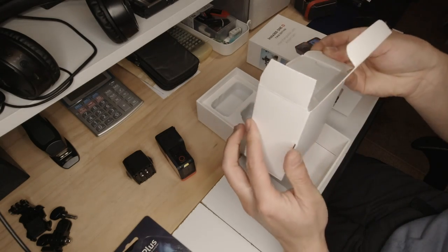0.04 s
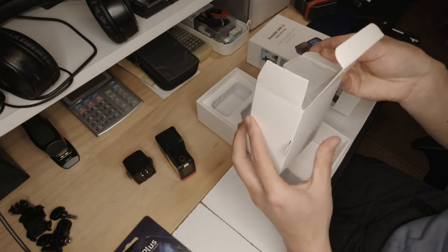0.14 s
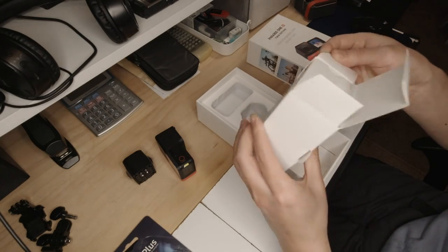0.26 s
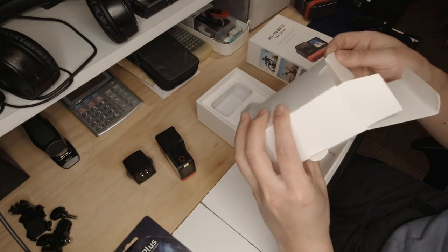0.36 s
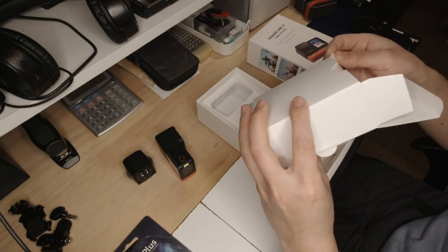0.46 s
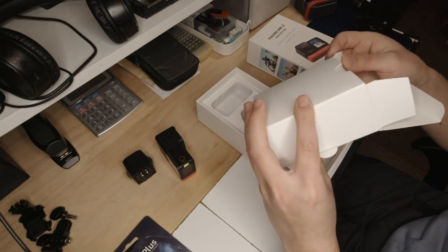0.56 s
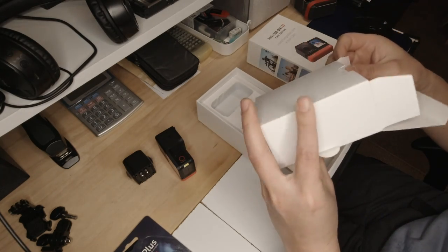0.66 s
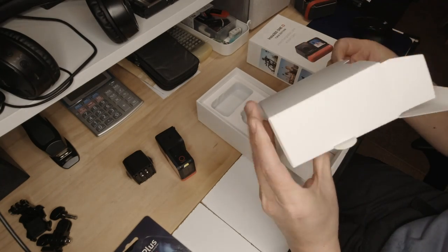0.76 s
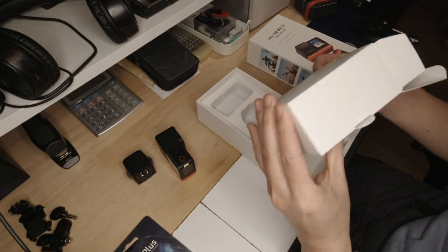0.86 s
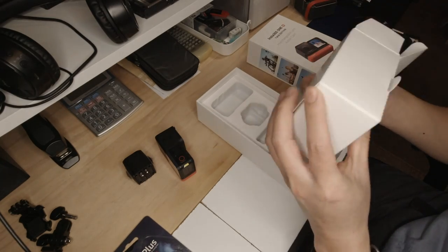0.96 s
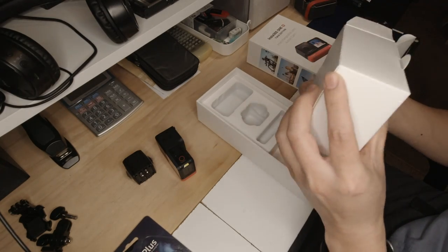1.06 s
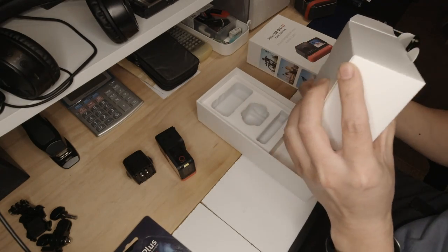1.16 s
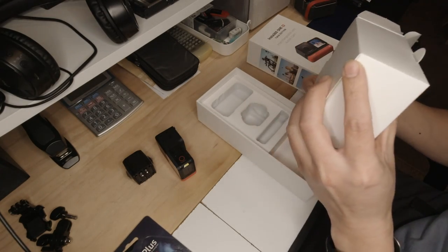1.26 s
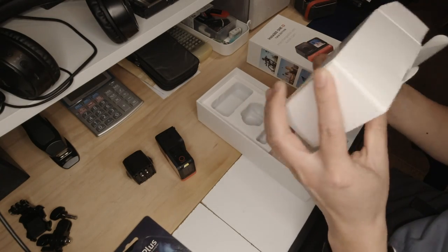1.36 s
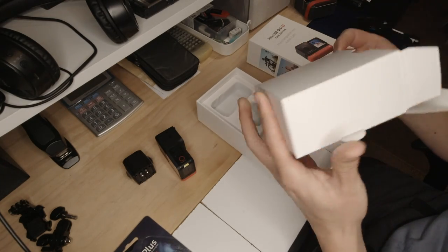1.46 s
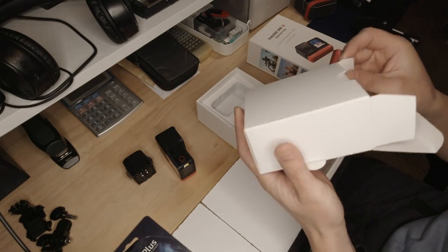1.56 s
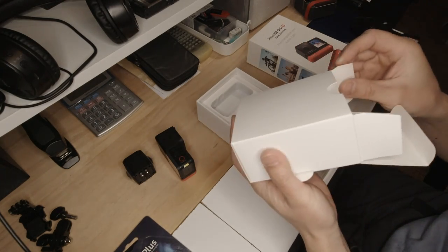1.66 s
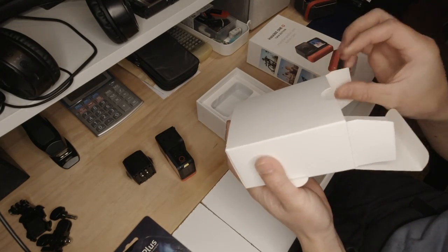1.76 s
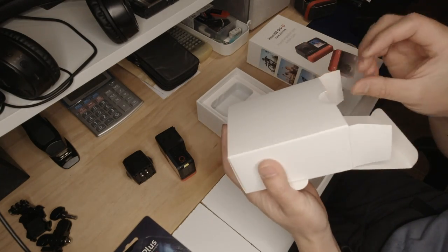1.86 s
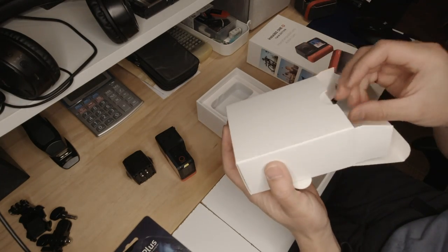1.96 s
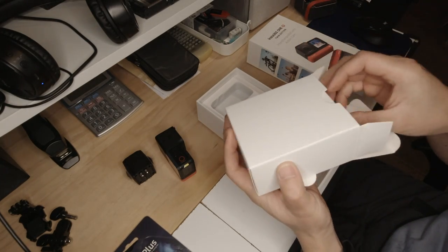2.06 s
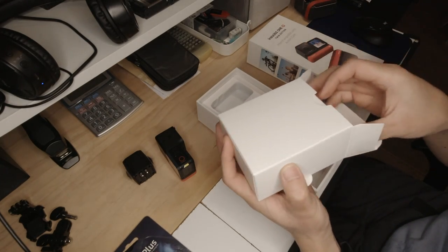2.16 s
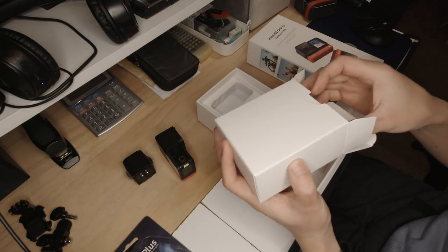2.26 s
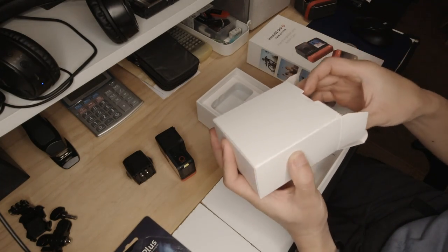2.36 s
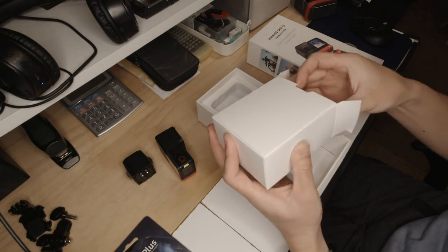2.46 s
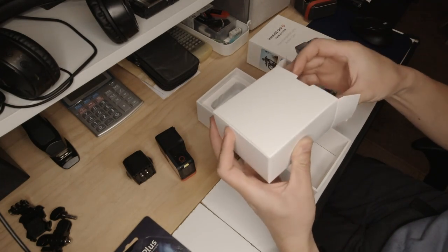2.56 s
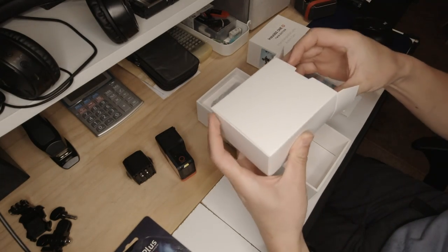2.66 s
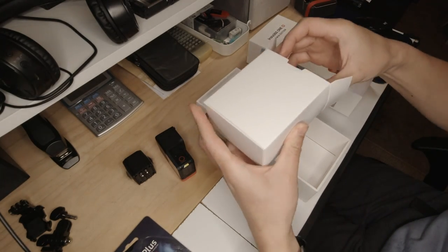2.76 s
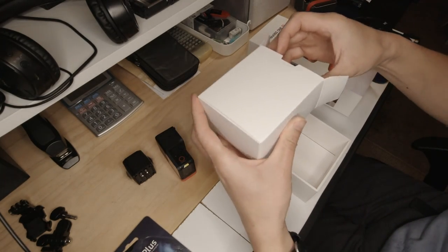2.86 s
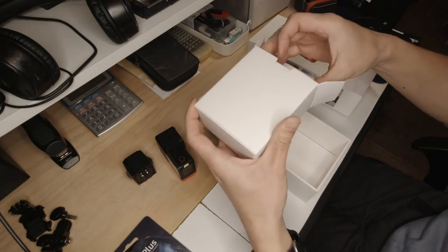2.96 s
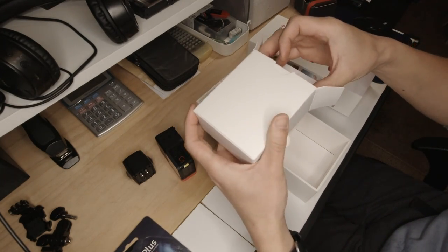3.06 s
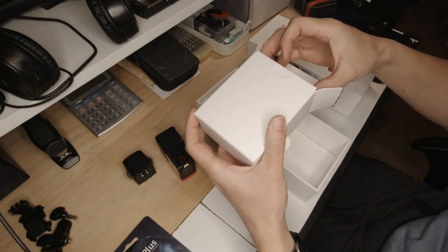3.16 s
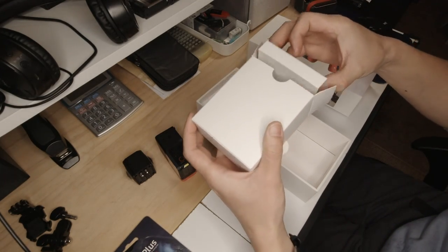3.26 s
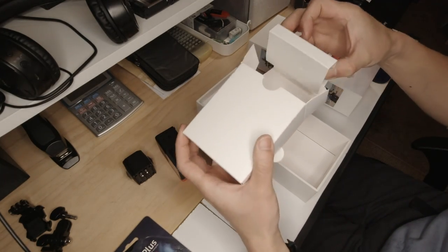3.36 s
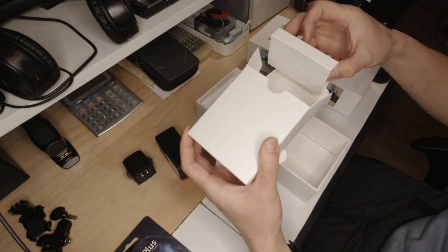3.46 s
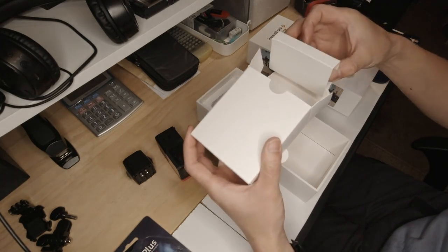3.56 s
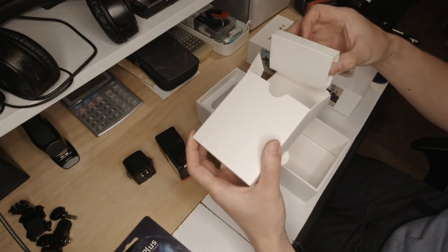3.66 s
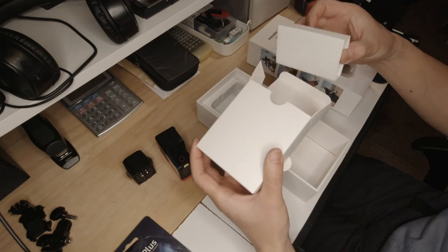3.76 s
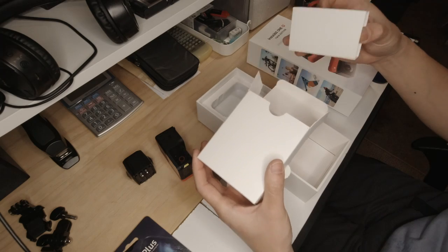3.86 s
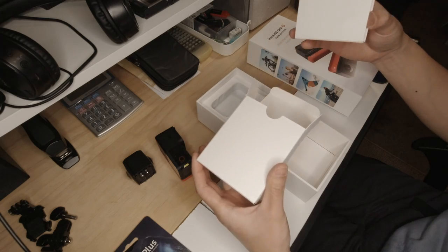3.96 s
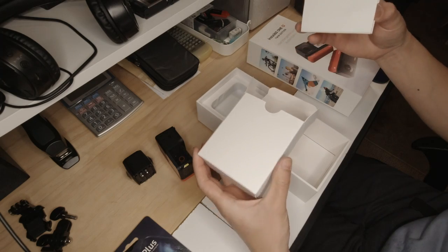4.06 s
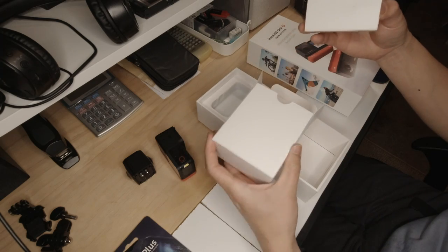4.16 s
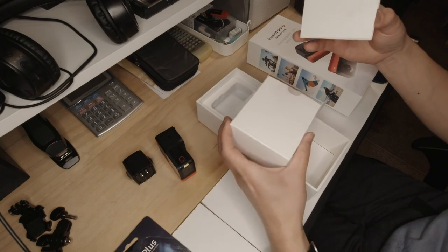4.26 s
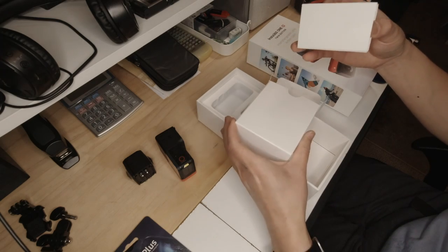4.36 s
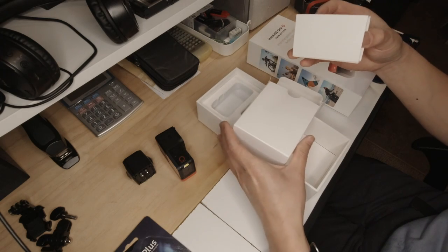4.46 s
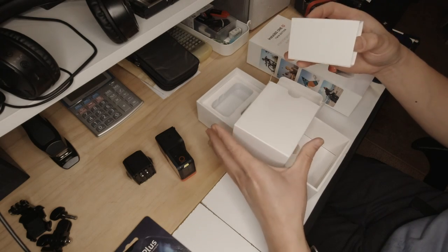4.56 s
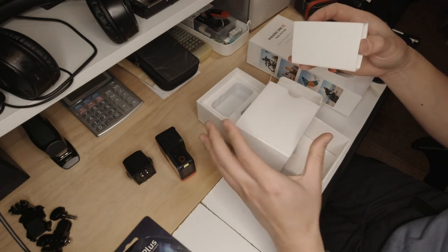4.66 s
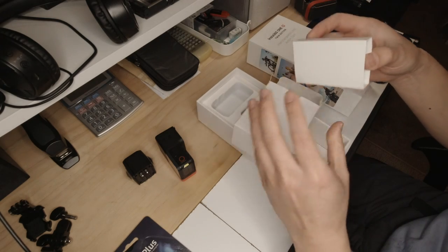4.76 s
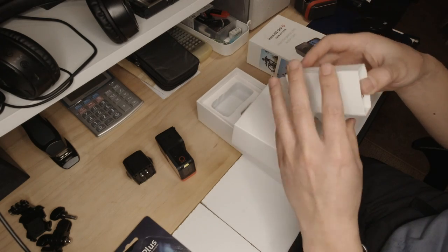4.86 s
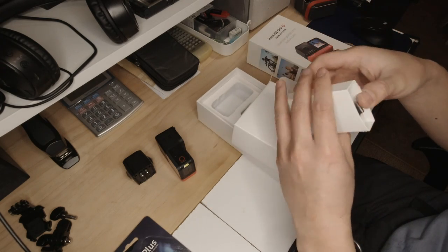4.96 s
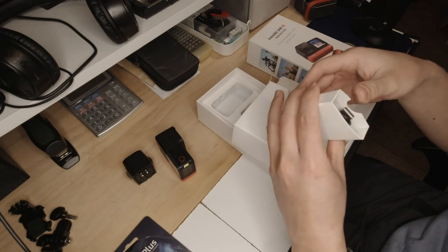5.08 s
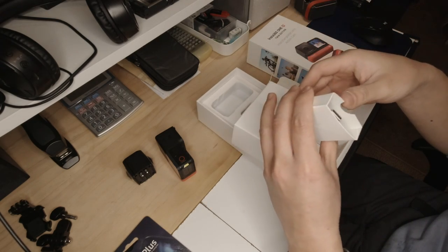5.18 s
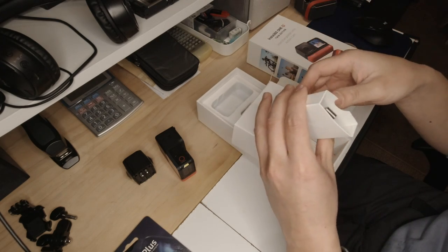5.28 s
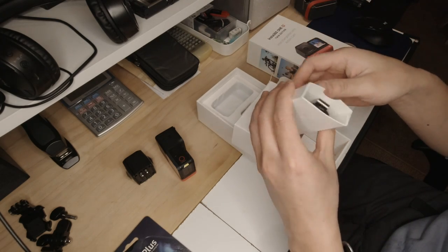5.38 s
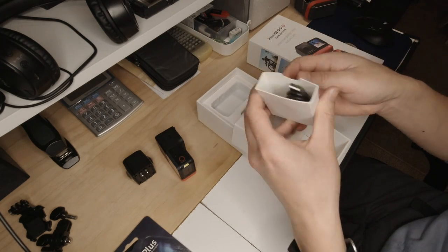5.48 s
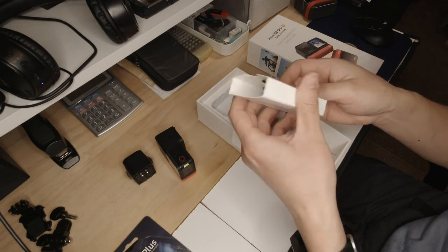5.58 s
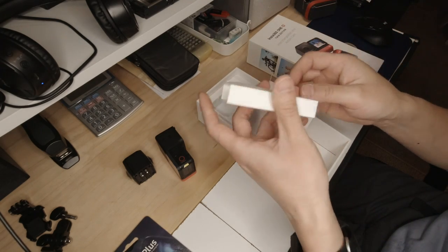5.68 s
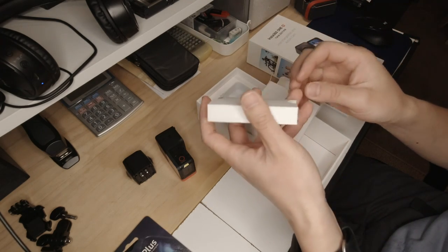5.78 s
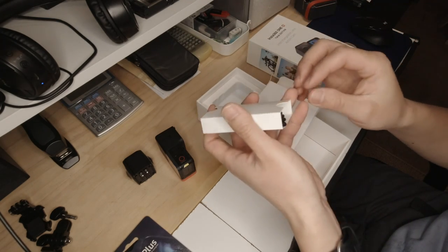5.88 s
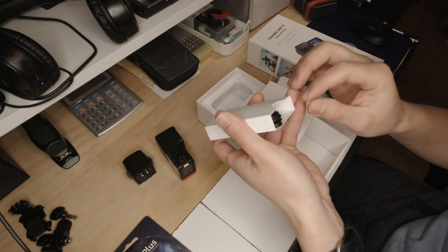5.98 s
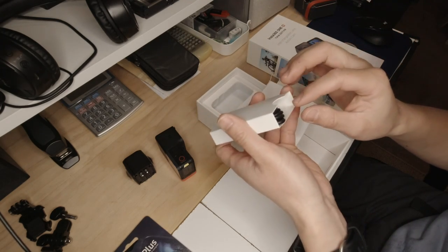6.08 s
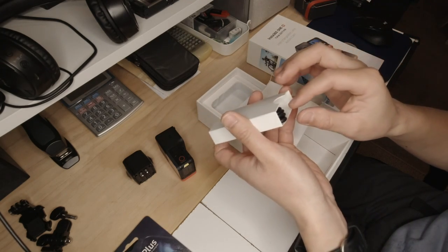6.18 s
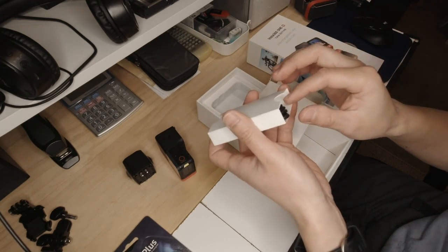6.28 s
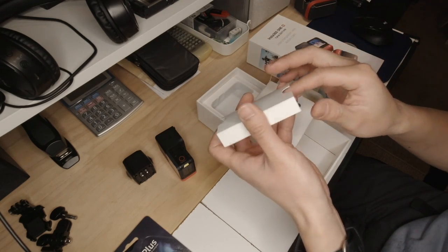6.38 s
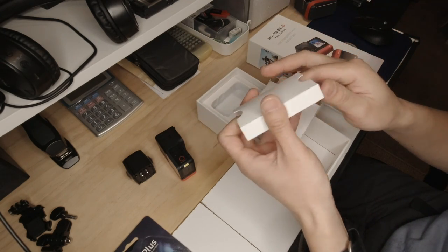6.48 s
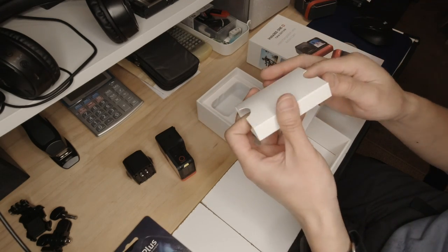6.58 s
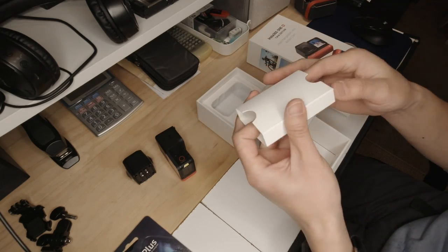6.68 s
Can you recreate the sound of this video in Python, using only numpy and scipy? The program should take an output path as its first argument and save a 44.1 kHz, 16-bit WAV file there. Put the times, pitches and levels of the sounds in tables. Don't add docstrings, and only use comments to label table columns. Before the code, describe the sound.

Stiff cardboard box turned in hands, card scraping and ticking, a small insert sliding free, a hard clattering set-down, then light dry fidgeting.

```python
import sys
import numpy as np
from scipy import signal
from scipy.fft import rfft, irfft
from scipy.io import wavfile
from scipy.ndimage import uniform_filter1d

SR = 44100
rng = np.random.default_rng(int(sys.argv[2]) if len(sys.argv) > 2 else 0)


def makeup_ratio(level_db):
    decades = np.asarray(level_db, float) / 20
    return 10 ** decades


def put_to_file(sound):
    columns = np.atleast_2d(sound).T
    safe = np.clip(columns, -1, 1)
    whole_steps = np.round(safe * 32767)
    wavfile.write(sys.argv[1], SR, whole_steps.astype(np.int16))


N = 296793
INSERT_S = 5


def unit(x):
    return x / np.sqrt(np.mean(x ** 2))


def peak(x):
    return x / np.abs(x).max()


def add(out, s, x):
    i = int(s * SR)
    out[i:i + len(x)] += x[:N - i]


def walk(rate_hz):
    k = int(SR / rate_hz)
    return uniform_filter1d(np.repeat(rng.standard_normal(N // k + 1), k), k)[:N]


def response(table):
    hz, db = np.transpose(table)
    f = np.maximum(np.fft.rfftfreq(4096, 1 / SR), 1)
    cepstrum = irfft(np.interp(np.log(f), np.log(hz), db) * np.log(10) / 20)
    cepstrum[1:2048] *= 2
    cepstrum[2049:] = 0
    return irfft(np.exp(rfft(cepstrum)))[:2048]


def band(x, lo_hz, hi_hz):
    return signal.sosfilt(signal.butter(3, [lo_hz, hi_hz], "band", fs=SR, output="sos"), x)


def filtered(x, order, hz, kind="low"):
    return signal.lfilter(*signal.butter(order, hz, kind, fs=SR), x)


def ring(x, hz, t60_s):
    pole = np.exp(2j * np.pi * hz / SR - np.log(1000) / (max(t60_s, .002) * SR))
    return signal.lfilter([1], [1, -pole], x).imag


def glide(x, hz, t60_s):
    turn = np.exp(2j * np.pi * np.cumsum(hz) / SR)
    decay = np.exp(-np.log(1000) / (max(t60_s, .002) * SR))
    return (turn * signal.lfilter([1], [1, -decay], x / turn)).imag


def slips(count, rate_hz, spread_db, smooth):
    sizes = makeup_ratio(np.minimum(spread_db * rng.exponential(size=count), 12))
    clicks = (rng.random(count) < rate_hz / SR) * sizes
    return unit(clicks) * np.sign(rng.standard_normal(count)) + smooth * rng.standard_normal(count)


# peak in seconds, rise in seconds, fall in seconds, peak level in dB,
# level of the card's flat against its edge in dB.
STROKES = [(0.018, 0.12, 0.068, -60.5, -1.5), (0.64, 0.088, 0.14, -51.5, -2),
           (0.71, 0.098, 0.071, -45, -10), (0.92, 0.048, 0.089, -65, 2), (1.039, 0.24, 0.13, -45.5, -2.5),
           (1.13, 0.19, 0.045, -55, -1.5), (1.46, 0.07, 0.22, -57, -7.5), (1.67, 0.11, 0.33, -53, -4),
           (2.141, 0.067, 0.15, -43.5, -3), (2.28, 0.035, 0.17, -63, -3.5), (2.37, 0.16, 0.2, -47, 0),
           (2.43, 0.042, 0.069, -49.5, 6), (2.5, 0.1, 0.11, -44.5, 0.5), (2.669, 0.071, 0.34, -52.5, -3),
           (2.82, 0.052, 0.21, -53.5, 4.5), (2.89, 0.042, 0.21, -49, 0), (2.955, 0.044, 0.11, -52, -12),
           (3.0, 0.025, 0.13, -61, 1), (3.06, .02, 0.091, -59, -9), (3.106, 0.011, 0.31, -44, -0.5),
           (3.15, 0.12, 0.39, -47, 0), (3.205, .012, 0.77, -47.5, -3), (3.3, 0.12, 0.17, -35, -7.5),
           (3.44, 0.089, 0.056, -65, 10.5), (4.44, 0.087, 0.12, -42, 0.5), (4.58, 0.14, 0.07, -66.5, 17.5),
           (5.022, 0.0092, 0.2, -55, -1), (5.11, 0.09, 0.14, -44, -14.5), (5.16, 0.018, 0.15, -44.5, -13),
           (5.21, 0.09, 0.071, -46, -6.5), (5.3, 0.094, 0.14, -51, -26), (5.63, 0.11, 0.38, -55.5, -17.5),
           (5.77, 0.17, 0.14, -60.5, -2), (6.036, 0.12, 0.077, -56, -11),
           (6.249, 0.081, 0.073, -40.5, -17.5), (6.35, 0.16, .15, -47, -26), (6.54, 0.35, 0.19, -38, -20.5),
           (6.73, 0.1, 0.089, -40, -15)]
# frequency in Hz, gain in dB.
CARD_SPECTRUM = [(88, -18.5), (150, -8.5), (199, -9.5), (498, -9), (570, -9.5), (662, -9), (1010, -6.5),
                 (1600, -7.5), (1860, -0.5), (2670, -1.5), (2960, 2.5), (3240, -4), (3940, -8.5),
                 (5400, -25.5), (7020, -100.5), (11900, -120)]
# frequency in Hz, width in Hz, level in dB.
BOX_RINGS = [(199, 160, -19), (1010, 63, 3.5), (2000, 190, 5.5), (1516, 150, -1.5), (2500, 200, -4.5),
             (3320, 160, -9), (4720, 150, -12)]
# time in seconds, ring in Hz.
INSERT_RING = [(5, 1950), (5.06, 1920), (5.11, 2320), (5.15, 2145), (5.21, 2355), (5.25, 1885),
               (5.45, 1777), (5.6, 2000), (6.0, 2140), (6.3, 2212), (6.5, 2026), (6.73, 2035)]
# frequency in Hz, t60 in seconds, level in dB.
INSERT_SIDES = [(1200, 0.011, -9), (2420, 0.023, -14), (2900, 0.038, -21.5), (3500, 0.026, -20),
                (3900, 0.016, -14), (4900, .015, -26.5)]
# low limit in Hz, high limit in Hz.
PART_BANDS = [(1500, 3100), (250, 700), (700, 1500), (3300, 6000)]


def rub():
    free_s, free_db_s = 3.468, 502
    depth_db = 20
    grip_db, insert_grip_db, grip_flat_db = -70.5, -77.5, -4
    hollow_db, fibre_db, insert_fibre_db = -9, -13.5, -11.5
    box_share, box_wander = .59, .08
    patchy_db = 4
    t = np.arange(N) / SR
    late = t > INSERT_S

    slow = t[::32]
    edge = makeup_ratio(np.where(slow < INSERT_S, grip_db, insert_grip_db))
    flat = edge * makeup_ratio(grip_flat_db)
    for s, rise, fall, db, flat_db in STROKES:
        away = np.where(slow < s, (s - slow) / max(rise, .01), (slow - s) / max(fall, .01))
        press = makeup_ratio(db - depth_db * away)
        press = press * makeup_ratio(-free_db_s * np.maximum(slow - free_s, 0) * (s < free_s))
        edge = np.hypot(edge, press)
        flat = np.hypot(flat, press * makeup_ratio(flat_db))
    edge, flat = np.interp(t, slow, edge), np.interp(t, slow, flat)
    fibre = edge * makeup_ratio(np.where(t < INSERT_S, fibre_db, insert_fibre_db))

    patches = walk(25)
    bursts = makeup_ratio(2.5 * walk(70)[::-1] + 1.5 * patches)
    force = slips(N, 1100, 3.6, 0.53) * bursts
    card = signal.fftconvolve(force, response(CARD_SPECTRUM))[:N]
    face = unit(glide(force, np.interp(t, *np.transpose(INSERT_RING)), 0.022))
    sides = sum(makeup_ratio(db) * unit(ring(force, hz, t60)) for hz, t60, db in INSERT_SIDES)
    insert = (face + sides) * late
    bend = 1 + box_wander * (t < INSERT_S) * np.tanh(unit(uniform_filter1d(patches, SR // 12)))
    box = np.zeros(N)
    for hz, width, db in BOX_RINGS:
        bent_hz = hz * np.roll(bend, int(hz * 20))
        box += makeup_ratio(db) * unit(glide(force, bent_hz, 4.2 / width))
    card = unit(card) * np.where(late, .45, 1) + 0.83 * insert + box_share * unit(box)

    out = np.zeros(N)
    sizes = edge, flat * makeup_ratio(hollow_db), flat, fibre
    for k, (size, limits) in enumerate(zip(sizes, PART_BANDS), 1):
        grain = makeup_ratio(patchy_db * np.minimum(np.roll(patches, N // 5 * k), 1))
        out += size * grain * unit(band(card, *limits))
    return out


def contact(force, colour, s, hz, body_db, crack_db):
    card = signal.fftconvolve(force, colour)[:len(force)]
    low_hz, high_hz = .62 * hz, 1.7 * hz
    t60_s, purity = (.009, .55) if s < INSERT_S else (.022, 3.2)
    modes = ring(force, hz, t60_s) + 0.041 * ring(force, 1.2 * hz, t60_s)
    panel = peak(band(card, low_hz, high_hz)) + purity * peak(band(modes, low_hz, high_hz))
    hollow = peak(band(card, 220, low_hz))
    narrow_side = peak(ring(force, 3770, 0.021))
    crack = peak(card) + (s > INSERT_S) * 0.22 * narrow_side
    return peak(panel) + makeup_ratio(body_db) * hollow + makeup_ratio(crack_db) * peak(band(crack, *PART_BANDS[3]))


# start in seconds, peak in dB, ring in Hz, crack in dB.
KNOCKS = [(0.13, -33, 2010, -6), (0.288, -35.5, 2500, -23), (0.301, -33.5, 2330, -36),
          (0.443, -45.5, 2070, -38), (0.725, -48.5, 1010, -25), (0.865, -33.5, 885, -29),
          (0.903, -38, 1900, -16), (1.408, -41, 2330, -1.5), (1.934, -39, 2250, -35),
          (2.092, -24.5, 1730, -19), (2.237, -21.5, 2030, -4.5), (2.438, -40.5, 1080, -24),
          (2.638, -32, 1590, -10), (2.686, -39.5, 1890, -21), (2.738, -31.5, 1520, -31),
          (2.848, -29.5, 1890, -26), (3.05, -31, 1060, -6), (3.101, -27.5, 2150, -20),
          (3.336, -22, 983, -30), (4.055, -51.5, 1890, -10), (4.2, -51.5, 1500, -9),
          (4.367, -11.5, 2250, -4.5), (4.385, -17.5, 1920, -13), (4.423, -13.5, 1073, -13.5),
          (4.471, -17, 1450, -9.5), (4.486, -12.5, 1250, -27)]
# start in seconds, peak in dB, ring in Hz, crack in dB.
TICKS = [(0.009, -41.5, 970, -13), (0.646, -30.5, 2010, -15), (0.689, -38.5, 1020, -39),
         (0.946, -22, 1006, -23), (1.663, -22, 1010, -16), (1.745, -26.5, 1425, -38),
         (2.121, -22.5, 1860, -18), (2.148, -16.5, 903, -16.5), (2.795, -17.5, 1550, -26.5),
         (2.986, -28, 1010, -15.5), (3.201, -27.5, 1580, -28), (3.348, -23.5, 1800, -5),
         (3.87, -46.5, 1090, -17), (4.154, -48, 1084, -52), (4.507, -21, 1080, -22.5),
         (5.081, -28, 1810, 4), (5.089, -21, 1960, -17), (5.149, -32, 2040, -23), (5.237, -17.5, 2520, -2),
         (5.908, -37, 1994, -21.5), (6.21, -14, 1952, -18.5), (6.268, -33, 2270, -28),
         (6.381, -37, 2030, -22), (6.471, -30.5, 2100, -17), (6.574, -33, 2070, -49),
         (6.593, -28.5, 2074, -25), (6.688, -20, 1920, -25.5), (6.697, -30.5, 1950, -20),
         (6.711, -22.5, 1940, -19), (6.723, -23.5, 1970, -28)]


def taps():
    out, colour, t = np.zeros(N), response(CARD_SPECTRUM), np.arange(6000) / SR
    lead_s = .004
    knock_cycles, knock_hollow_db, tick_t60_s, tick_hollow_db = 72, -6, 0.026, -28
    soft_from_s, soft_touch = 6.25, 1.43
    blows = [(*k, knock_cycles / k[2], knock_hollow_db) for k in KNOCKS]
    blows += [(*k, tick_t60_s, tick_hollow_db) for k in TICKS]
    late = t - lead_s
    lead_in = .04 * np.clip(t / lead_s, 0, 1) * (late < 0)
    for s, db, hz, crack_db, t60, body_db in sorted(blows):
        soft = 1 + soft_touch * (s > soft_from_s)
        tail = 0.11 * np.exp(-np.log(1000) * late / (2.3 * t60))
        shape = np.exp(-late / (0.00091 * soft)) + tail
        push = lead_in + shape * np.clip(late / (0.00092 * soft), 0, 1)
        force = slips(len(t), 2600, 1.3, 2.64) * push
        add(out, s - lead_s, makeup_ratio(db - 1.0) * contact(force, colour, s, hz, body_db, crack_db))
    return out


# start in seconds, peak in dB, ring in Hz, hold in seconds,
# t60 in seconds.
PANEL_RINGS = [(0.13, -42.5, 1450, 0.0034, 0.026), (0.947, -36.5, 1530, 0.0044, 0.0093),
               (1.664, -26.5, 950, 0.00086, 0.027), (2.149, -24.5, 1490, 0.0026, 0.012),
               (2.2373, -19.5, 940, 0.0033, 0.011), (2.2374, -13.5, 1936, 0.0022, 0.0035),
               (2.64, -46, 1488, .03, 0.018), (2.795, -31, 2270, 0.0012, 0.015),
               (2.99, -38.5, 2120, 0.0045, .025), (3.05, -36, 2244, 0.0028, 0.013),
               (0.866, -38.5, 970, 0.0028, 0.018), (4.424, -22.5, 1506, .004, .02),
               (3.33, -27, 970, .009, 0.018), (3.348, -26, 890, 0.0032, 0.014),
               (3.348, -28, 3240, .003, 0.0077), (3.409, -31, 2200, 0.0035, 0.017),
               (3.431, -32.5, 2190, 0.0039, 0.018), (4.368, -12.5, 2944, 0.0028, 0.0086),
               (4.368, -30.5, 4420, 0.0026, 0.019), (4.368, -29.5, 760, 0.00094, 0.037),
               (4.4225, -25.5, 1884, 0.0035, 0.02), (4.425, -19, 962, 0.0027, 0.028),
               (4.483, -29.5, 1894, 0.0053, 0.016), (4.487, -22.5, 617, 0.0053, 0.039),
               (5.081, -36.5, 1190, .003, 0.027), (5.082, -31.5, 3875, .008, 0.022),
               (5.205, -29, 2440, 0.0032, 0.011), (5.233, -19.5, 2290, 0.0018, .008),
               (5.2375, -11.5, 1864, 0.0041, 0.013), (5.238, -29.5, 1200, 0.0039, 0.024),
               (5.237, -35.5, 3900, 0.0046, 0.017), (5.317, -41, 1770, 0.0063, 0.048),
               (6.214, -29.5, 1980, 0.0032, 0.038), (4.472, -25, 1060, 0.0047, 0.018),
               (6.21, -24.5, 1200, 0.0044, 0.025), (6.478, -27, 2060, .006, 0.011),
               (6.568, -31.5, 2220, 0.0056, .012), (1.03, -34.5, 2230, .015, 0.026),
               (6.21, -30.5, 2900, 0.0028, 0.029), (6.199, -41.5, 4900, .015, 0.037)]


def wide_panels():
    out, t = np.zeros(N), np.arange(3000) / SR
    attack_s = 0.00066
    swell = np.sin(np.pi / 2 * np.clip(t / attack_s, 0, 1)) ** 2
    for s, db, hz, held, t60 in PANEL_RINGS:
        decay = np.exp(-np.log(1000) * np.maximum(t - held, 0) / max(t60, .003))
        add(out, s, makeup_ratio(db) * swell * decay * np.sin(2 * np.pi * hz * t))
    return out


# start in seconds, peak in dB, ring in Hz, crack in dB.
CATCHES = [(.144, -35, 2750, -18), (0.611, -46, 895, -25), (.691, -31.5, 2500, -9),
           (0.724, -43.5, 2620, -13), (0.906, -50, 3200, -7), (0.984, -35.5, 830, -28.5),
           (1.008, -39.5, 1000, -19), (1.034, -27, 2260, -21.5), (1.051, -41.5, 1010, -17),
           (2.353, -39.5, 1910, -18), (2.393, -31.5, 1420, -16), (2.408, -28, 1600, -16.5),
           (2.475, -34, 965, -18), (2.514, -28.5, 1400, -12), (2.886, -40.5, 935, -11),
           (3.044, -35, 940, -12), (3.101, -33.5, 895, -22), (3.155, -32, 2240, -12.5),
           (3.249, -27, 1590, -16), (3.275, -28, 2490, -18), (3.293, -30, 1500, -15),
           (4.241, -48.5, 1410, -18), (4.351, -35, 2900, -4.5), (4.397, -26.5, 2215, -14),
           (4.432, -27.5, 1376, -10.5), (4.441, -20, 1475, -14.5), (4.453, -22.5, 1920, -13),
           (4.476, -25.5, 2610, 1), (4.498, -31, 1120, -17.5), (4.53, -29.5, 902, -20),
           (5.021, -37, 2375, -22), (5.071, -42, 1230, -5), (5.197, -29, 2170, -7), (5.252, -28, 1930, -24),
           (5.269, -32, 1880, -6.5), (6.334, -38, 2240, -29), (6.424, -41.5, 2220, -23),
           (6.443, -41, 2200, -25), (6.546, -30.5, 2060, -5)]


def catches():
    out, colour, t = np.zeros(N), response(CARD_SPECTRUM), np.arange(2500) / SR
    hollow_db = -28
    snag = np.clip(t / 0.00046, 0, 1) * np.exp(-t / 0.0035)
    for s, db, hz, crack_db in CATCHES:
        force = slips(len(t), 2200, 2.8, 1.5) * snag
        add(out, s, makeup_ratio(db) * contact(force, colour, s, hz, hollow_db, crack_db))
    return out


# start in seconds, peak in dB, centre in Hz, length in seconds, fibres in dB.
SCUFFS = [(0.121, -30.5, 2400, 0.066, -16), (0.302, -44.5, 3530, 0.064, -13), (0.61, -43, 1000, 0.067, -18),
          (0.685, -42, 960, 0.032, -21.5), (0.976, -24, 985, 0.031, -22), (1.025, -23, 1075, 0.038, -22),
          (1.819, -40.5, 1510, 0.067, -20), (2.399, -32, 1590, 0.057, -34.5),
          (2.486, -25.5, 1620, 0.038, -11), (2.504, -23.5, 1340, 0.017, -30),
          (3.221, -21.5, 1550, 0.12, -18.5), (3.419, -26.5, 2370, 0.039, -41),
          (5.018, -36.5, 1924, 0.058, -7.5), (5.074, -20.5, 1880, 0.02, -15),
          (5.19, -27.5, 2260, 0.045, -36), (5.23, -19, 1834, 0.0064, -7), (5.241, -19.5, 1960, 0.039, -14),
          (5.57, -35, 1980, 0.11, -12), (5.668, -48.5, 2000, 0.13, -1.5), (5.973, -33, 2060, 0.14, -33.5),
          (6.041, -33.5, 1840, 0.022, -16), (6.088, -45, 2170, 0.039, -30),
          (6.337, -35.5, 2130, 0.026, -27), (6.546, -40.5, 1890, 0.064, 8.5)]


def scuffs():
    out, colour, t = np.zeros(N), response(CARD_SPECTRUM), np.arange(6000) / SR
    for s, db, hz, length, fibre_db in SCUFFS:
        swell = (t / length) ** 1.12 * np.exp(-4.5 * t / length)
        force = slips(len(t), 2500, 2.9, 0.96) * swell
        hollow_db = -17.5 - 15 * (s > INSERT_S)
        add(out, s, makeup_ratio(db - 3.5) * contact(force, colour, s, hz, hollow_db, fibre_db))
    return out


# start in seconds, peak in dB,
# pitch in Hz, t60 in seconds.
THUDS = [(0.123, -58, 72, 0.058), (1.665, -31, 290, 0.14), (1.93, -39, 130, 0.017),
         (2.146, -28, 236, 0.046), (2.239, -30.5, 295, 0.056), (3.333, -23.5, 150, 0.03),
         (4.37, -38, 129, 0.082), (4.422, -33, 94, 0.1), (4.486, -21, 109, 0.11), (4.961, -36, 106, 0.015),
         (0.137, -40.5, 296, 0.032), (0.29, -49, 330, 0.026), (0.914, -37, 312, 0.023),
         (0.991, -33.5, 417, 0.025), (1.451, -44.5, 370, 0.027), (1.495, -46.5, 294, 0.038),
         (3.331, -27.5, 345, 0.029), (3.392, -42, 340, .025), (3.422, -33, 350, 0.038),
         (3.462, -41, 476, .02), (6.479, -39.5, 580, 0.019), (6.715, -37.5, 620, .015),
         (2.569, -44, 89, 0.066), (2.645, -42.5, 127, 0.047), (2.745, -43.5, 110, .05),
         (2.93, -41.5, 173, 0.035), (3.0, -39.5, 85, 0.044)]


def thuds():
    out, t = np.zeros(N), np.arange(12000) / SR
    push = np.exp(-((t - .003) / 0.000086) ** 2)
    for s, db, hz, t60 in THUDS:
        t60 = min(t60, 9 / hz)
        boom = ring(push, hz, t60) + 0.16 * ring(push, 0.21 * hz, 0.15 * t60)
        add(out, s, makeup_ratio(db - 3.0) * peak(boom))
    return out


# start in seconds, hold in seconds, sheen in dB,
# whistle above it in dB.
GLOSS = [(2.165, 0.067, -67, 2), (2.233, 0.0033, -60.5, -18), (3.276, 0.051, -64, 10),
         (3.344, 0.01, -58.5, 12), (3.38, 0.088, -76.5, -14), (4.368, .003, -53, 20.5),
         (4.421, 0.082, -74.5, 13.5), (5.084, 0.0084, -63.5, -12.5), (5.236, .003, -68.5, 1),
         (6.154, 0.036, -66, 22), (6.208, 0.058, -62, 14.5), (6.29, 0.21, -66.5, 18.5),
         (6.53, 0.11, -68.5, 12)]
# frequency in Hz, gain in dB.
SHEEN_SPECTRUM = [(4120, -49), (7000, -29), (7370, 3), (9080, 1.5), (10600, -4), (11000, -28.5),
                  (11500, -20.5), (15000, -60.5), (22000, -120)]
# time in seconds, pitch in Hz, level in dB.
WHISTLE = [(6.16, 5830, 0.5), (6.21, 5790, -9), (6.3, 5730, -2.5), (6.36, 5720, -4.5), (6.5, 5610, -14)]


def gloss():
    rise_db_s, sag_db_s, fall_db_s = 1499.5, 21.5, 479
    top_db = 54
    octave_from_s, octave_to_s, octave_db = 6.15, 6.24, -78
    t = np.arange(N) / SR
    late = np.arange(N) > INSERT_S * SR
    force = slips(N, 5700, 2.0, 4.0) * makeup_ratio(2.2 * walk(40))

    hiss = signal.fftconvolve(force, response(SHEEN_SPECTRUM))[:N]
    box_sheen = unit(band(band(hiss, 8260, 10000), 8440, 10100))
    insert_sheen = unit(band(band(hiss, 7500, 9500), 7500, 9500))
    sheen = np.where(np.arange(N) < INSERT_S * SR, box_sheen, insert_sheen)
    top = unit(band(band(force, 9600, 11200), 9600, 11200))

    at, hz, pipe_db = np.transpose(WHISTLE)
    hz, pipe_db = np.interp(t, at, hz), np.interp(t, at, pipe_db)
    pipe = makeup_ratio(pipe_db) * unit(glide(force, hz, .03)) + 0.34 * unit(ring(force, 4900, .02))
    breath = .4 * unit(band(force, 4500, 6300))
    whistle = unit(late * band(pipe, 4500, 6070) + breath)
    sheen = sheen * makeup_ratio(1.5 * walk(22))
    whistle = whistle * makeup_ratio(1.5 * walk(14))

    press = np.sin(np.pi * np.clip((t - octave_from_s) / (octave_to_s - octave_from_s), 0, 1))
    octave = unit(band(glide(force, 2.03 * hz, .006), 11300, 12050))
    out = makeup_ratio(octave_db) * press * octave
    for s, held, db, whistle_db in GLOSS:
        near = slice(int((s - .06) * SR), int((s + held + .2) * SR))
        after = t[near] - s
        loss = np.where(after < 0, -rise_db_s * after, sag_db_s * after)
        loss = loss + fall_db_s * np.maximum(after - held, 0)
        sizzle_db = top_db - 4.5 * (s > INSERT_S) + db - loss
        layers = sheen[near] + makeup_ratio(whistle_db - 7.5) * whistle[near] + makeup_ratio(sizzle_db) * top[near]
        out[near] += makeup_ratio(db - loss) * layers
    return out


# time in seconds, slot ring in dB.
EXIT = [
    (3.355, -34),
    (3.367, -42),
    (3.405, -43.5),
    (3.437, -39),
    (3.461, -41),
    (3.485, -88),
]
# time in seconds, pitch in Hz.
SLOT_GLIDE = [(3.36, 3820), (3.41, 3900), (3.47, 4120)]


def slot():
    s, ring_db = np.transpose(EXIT)
    overtone_db, overtone_db_s = -10, 97
    over_db = ring_db + overtone_db + overtone_db_s * (s - s[0])
    t = np.arange(s[0], s[-1], 1 / SR)
    force = slips(len(t), 2500, 2.2, 3.0)
    low = unit(band(ring(force, 2203, 0.017), 1950, 2640))
    over_hz = np.interp(t, *np.transpose(SLOT_GLIDE))
    high = unit(band(glide(force, over_hz, 0.016), 2300, 5340))
    out = np.zeros(N)
    add(out, s[0], makeup_ratio(np.interp(t, s, ring_db)) * low + makeup_ratio(np.interp(t, s, over_db)) * high)
    return out


# time in seconds, slip rate in Hz, level in dB.
SQUEAK = [
    [(4.75, 220, -56), (4.764, 199, -37.5), (4.778, 190, -32.5), (4.815, 286, -35.5)],
    [(4.815, 287, -38.5), (4.823, 315, -49), (4.849, 369, -43.5), (4.875, 378, -68)],
]


def squeak():
    s, hz, db = np.vstack(SQUEAK).T
    t = np.arange(s[0], s[-1] + .15, 1 / SR)
    rate_hz = np.interp(t, s, hz)
    phase = 2 * np.pi * np.cumsum(rate_hz) / SR
    fade = np.clip(np.minimum(t - s[0], s[-1] - t) / 0.0038, 0, 1)
    size = np.sqrt(2) * makeup_ratio(np.interp(t, s, db)) * fade
    grit = unit(band(rng.standard_normal(len(t)), 400, 820))
    firm = np.clip((330 - rate_hz) / 120, 0, 1)
    skin = size * (np.sin(phase) + 0.14 * firm * np.sin(2 * phase) + 0.024 * grit)
    out = np.zeros(N)
    add(out, s[0], skin + 0.00076 * ring(skin, 230, 0.26))
    return out


# frequency in Hz, lead of the left in radians.
PORTS = [(0, 0), (2330, 0.4), (2760, 2.5), (3960, 1.2), (4820, 2.2), (5680, 1.7), (6460, 0.1), (7240, -0.1),
         (7750, -4.2), (8350, -3.9), (8960, -5.2), (9390, -5.9), (10700, -2.9), (11600, 1.4)]


def ports(x):
    hz, lead = np.transpose(PORTS)
    turn = np.exp(.5j * np.interp(np.fft.rfftfreq(2 * N, 1 / SR), hz, lead))
    spectrum = rfft(x, 2 * N)
    return np.array([irfft(spectrum * turn)[:N], irfft(spectrum / turn)[:N]])


def room(x):
    t60_s, level_db, dull_hz = 0.27, -12, 3580
    t = np.arange(int(.6 * SR)) / SR
    noise = rng.standard_normal((3, len(t)))
    noise = noise[0] + filtered(noise[1:], 1, 1500, "high") + .3 * noise[1:]
    dull = filtered(noise, 1, dull_hz)
    fall = np.log(1000) * t / t60_s
    tail = (dull * np.exp(-fall) + .5 * noise * np.exp(-1.8 * fall)) * np.clip(t / 0.0015, 0, 1)
    tail *= makeup_ratio(level_db) / np.sqrt(np.sum(tail[0] ** 2))
    return signal.fftconvolve(x[None], tail, axes=1)[:, :N]


# frequency in Hz, gain in dB.
AIR_SPECTRUM = [(12, -32), (20, -14.5), (43, 11), (111, 0), (542, -21), (587, -30.5), (725, -16),
                (1170, -25), (1690, -28.5), (1980, -8.5), (2510, -21), (3530, -23), (6320, -39.5),
                (7400, -42.5), (11000, -66.5), (14300, -68), (22000, -120)]


def air():
    colour, level_db = response(AIR_SPECTRUM), -59.5
    mid, side = (signal.fftconvolve(rng.standard_normal(N), colour)[:N] for _ in range(2))
    side = 0.14 * side + 0.63 * filtered(side, 1, 150, "high") + 0.31 * filtered(side, 2, 2300, "high")
    both = unit(mid + side * np.array([[1], [-1]]))
    bass = filtered(both, 2, 150)
    return makeup_ratio(level_db) * (bass * makeup_ratio(0.57 * walk(60)) + (both - bass) * makeup_ratio(1.0 * walk(2.6)))


def scene():
    housing_hz = 6300
    card = rub() + taps() + wide_panels() + catches() + scuffs() + thuds() + slot() + squeak()
    card = card + 0.084 * ring(band(card, 3640, 5520), 5240, 0.006)
    dulled = signal.sosfilt(signal.butter(4, housing_hz, fs=SR, output="sos"), card)
    box = dulled + gloss()
    return ports(box) + room(box) + air()


def top_cut(x):
    return signal.sosfilt(signal.butter(12, 12060, fs=SR, output="sos"), x)


def record(dry):
    return top_cut(dry)


dry = scene()
out = record(dry)
put_to_file(out)
```